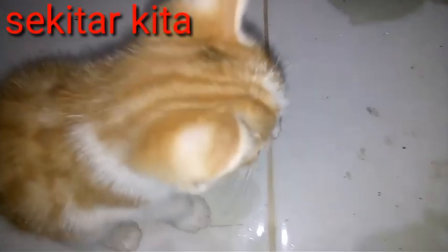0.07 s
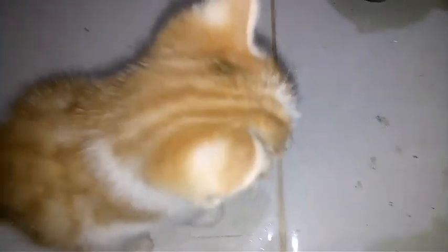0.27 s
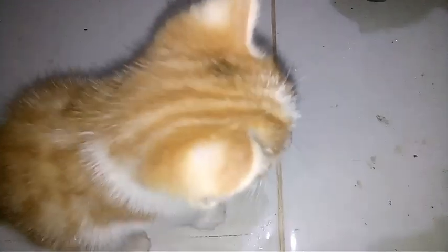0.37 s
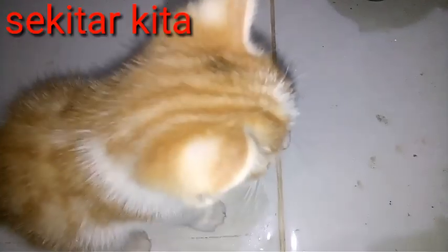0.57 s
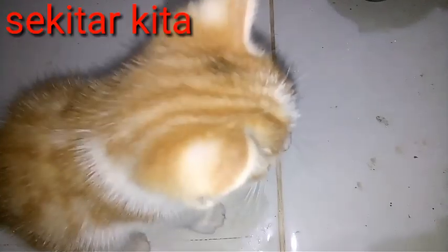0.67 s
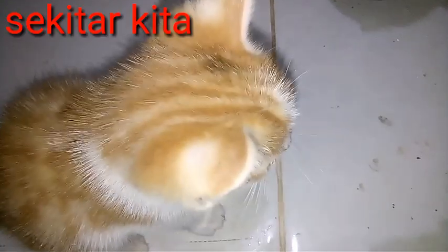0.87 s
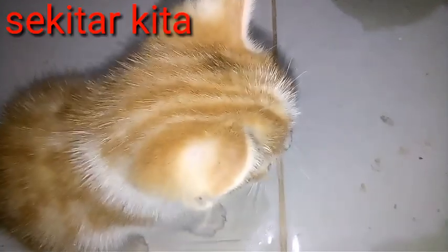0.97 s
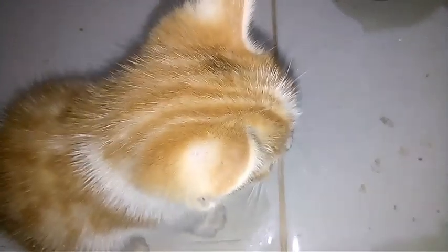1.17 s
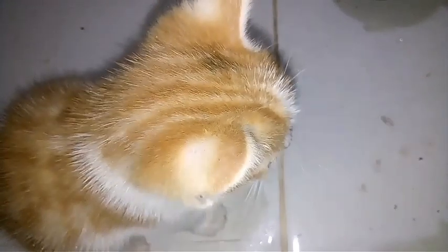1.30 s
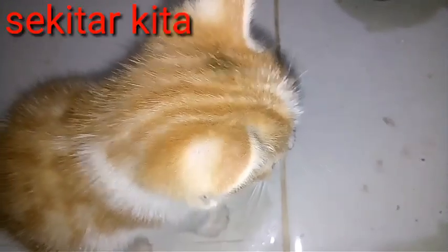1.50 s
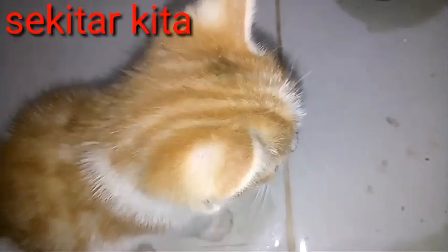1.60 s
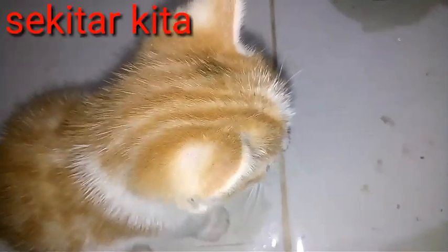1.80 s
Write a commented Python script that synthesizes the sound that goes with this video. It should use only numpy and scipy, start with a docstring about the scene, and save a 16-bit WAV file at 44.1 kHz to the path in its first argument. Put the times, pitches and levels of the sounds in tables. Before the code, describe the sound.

One sharp, dry knock on a hand-held camera thumps the microphone at about 0.2 seconds, far louder than anything else. Tiny casing ticks follow near 0.35 seconds, and the grip rustles slightly around 0.3 and 1.3 seconds. Faint room hiss, low rumble and a thin electrical whine continue throughout, with a distant motor hum from 0.6 seconds. Two brief, far tones barely emerge near 0.5 and 1.75 seconds.

```python
"""A quiet room, heard through a hand-held camera above a crouching cat.
Steady hiss, low rumble and a thin electrical whine lie under a far motor's faint hum.
One sharp knock on the camera's body thumps the microphone, with tiny ticks of the hand on the casing.
The grip rustles slightly twice, and two brief, far tones barely rise out of the hiss."""
import sys
import numpy as np
from scipy import signal
from scipy.fft import rfft, irfft, next_fast_len
from scipy.io import wavfile
from scipy.ndimage import uniform_filter1d, minimum_filter1d, map_coordinates

SR = 44100
rng = np.random.default_rng(int(sys.argv[2]) if len(sys.argv) > 2 else 0)


def persist_wave(psi):
    """Save psi, clipped to +-1, as 16-bit WAV."""
    counts = np.round(np.clip(psi, -1, 1) * 32767).astype(np.int16)
    wavfile.write(sys.argv[1], SR, np.atleast_2d(counts).T)


N = 81585
TIME_S = np.arange(N) / SR


def amp(db):
    """Decibels to gain."""
    return 10 ** (np.asarray(db) / 20)


def unit(x):
    """Scale to rms 1."""
    return x / np.sqrt(np.mean(x ** 2) + 1e-20)


def gain_at(spectrum, hz):
    """Gain of (Hz, dB) points, interpolated in log frequency."""
    points_hz, db = np.transpose(spectrum)
    return amp(np.interp(np.log(hz + 1), np.log(points_hz + 1), db))


def level(points):
    """(s, dB) points to a gain per sample."""
    return amp(np.interp(TIME_S, *np.transpose(points)))


def swell(centre_s, width_s):
    """Gaussian envelope."""
    return np.exp(-.5 * ((TIME_S - centre_s) / width_s) ** 2)


def wobble(rate_hz):
    """Smooth random curve."""
    knots = rng.standard_normal(int(N * rate_hz / SR) + 4)
    return map_coordinates(knots, [TIME_S * rate_hz])


def sine(cycles):
    """Sine of rms 1, random start phase."""
    return np.sqrt(2) * np.sin(2 * np.pi * (cycles + rng.random()))


def filtered(x, response):
    """Zero-phase filter with gain response(hz)."""
    size = next_fast_len(N + SR // 2)
    hz = np.fft.rfftfreq(size, 1 / SR)
    return irfft(rfft(x, size) * response(hz), size)[:N]


def noise(spectrum):
    """Coloured noise of rms 1."""
    return unit(filtered(rng.standard_normal(N), lambda hz: gain_at(spectrum, hz)))


def patchy(x, depth_db):
    """Slow, narrow-band patches of random gain; output rms 1."""
    bins = signal.stft(x, nperseg=1024)[2]
    patches = uniform_filter1d(rng.standard_normal(bins.shape), size=4, axis=0)
    patches = uniform_filter1d(patches, size=12, axis=1)
    bins *= amp(depth_db * unit(patches))
    return unit(signal.istft(bins, nperseg=1024)[1][:N])


def struck(blows, spectrum, size=8192, stop_hz=43, stop_db=23):
    """(s, dB) impulses through a minimum-phase spectrum and the microphone's bass roll-off."""
    cepstrum = irfft(np.log(gain_at(spectrum, np.fft.rfftfreq(size, 1 / SR))))
    cepstrum[1:size // 2] *= 2
    cepstrum[size // 2 + 1:] = 0
    response = irfft(np.exp(rfft(cepstrum)))
    impulses = np.zeros(N)
    for time_s, db in blows:
        impulses[round(time_s * SR)] += amp(db)
    low_cut = signal.cheby2(3, stop_db, stop_hz, "high", fs=SR, output="sos")
    return signal.sosfilt(low_cut, signal.fftconvolve(impulses, response)[:N])


# Rumble spectrum (frequency [Hz], relative density [dB])
RUMBLE_SPECTRUM = [(20, -1), (40, -10), (90, -1), (180, 0.5), (280, 0), (400, -7), (600, -44.5)]
# Rumble envelope before gain (time [s], level [dB])
RUMBLE_ENVELOPE = [(0, -67), (.3, -66), (.6, -70.5), (.76, -66.5), (.92, -70.5), (1.3, -68.5), (1.55, -73),
                   (1.72, -69.5), (1.85, -67)]

def room_rumble(gain_db=3):
    """Low, gently uneven room noise."""
    return amp(gain_db) * level(RUMBLE_ENVELOPE) * patchy(noise(RUMBLE_SPECTRUM), depth_db=3)


# Hiss band spectra (frequency [Hz], relative density [dB])
BROAD_SPECTRUM = [(240, -23), (400, -6), (480, -5.5), (600, 1), (1000, 0), (1340, -5), (1680, -1.5),
                  (2250, -3.5), (2850, -12), (3400, -7.5), (4300, -11.5), (5500, -11.5), (6600, -17.5),
                  (7300, -26.5), (8200, -40.5), (10000, -70)]
MID_SPECTRUM = [(500, -51), (900, -25), (1400, -4), (1680, 1), (2300, -12), (2950, -4.5), (3400, -15.5),
                (4500, -40), (8000, -69)]
SIZZLE_SPECTRUM = [(3000, -65), (4200, -16), (5000, 0), (5500, 4), (5850, -4), (6300, -26), (8000, -64)]
# Hiss band envelopes (time [s], level [dB])
MID_ENVELOPE = [(0, -68.5), (.5, -67), (.85, -68.5), (1.25, -69), (1.55, -73), (1.7, -78), (1.85, -87)]
SIZZLE_ENVELOPE = [(0, -78), (.6, -93), (.8, -73.5), (.95, -84), (1.28, -82), (1.4, -71.5), (1.55, -82),
                   (1.6, -88), (1.67, -71.5), (1.76, -71), (1.85, -82)]

def room_hiss(broad_db=-63.5):
    """Steady broad hiss; a mid band fades and a narrow high sizzle comes and goes."""
    broad = amp(broad_db) * patchy(noise(BROAD_SPECTRUM), depth_db=2.32)
    mid = level(MID_ENVELOPE) * noise(MID_SPECTRUM)
    sizzle = level(SIZZLE_ENVELOPE) * noise(SIZZLE_SPECTRUM)
    return broad + mid + sizzle


def electrical_whine(hz=6449, level_db=-89.5):
    """One thin, steady tone."""
    return amp(level_db) * sine(hz * TIME_S)


# Weak motor partials (cycle multiple, relative level [dB])
WEAK_PARTIALS = [(2, -5.5), (5, -7), (6, -14)]
# Envelopes of the weak partials and the strongest, the drone (time [s], level [dB])
WEAK_ENVELOPE = [(0, -80), (.3, -72), (.45, -68), (.7, -59.5), (1.05, -61.5), (1.4, -60), (1.85, -71)]
DRONE_ENVELOPE = [(0, -75.5), (.48, -72.5), (.6, -58.5), (.76, -57), (.9, -72), (.98, -66), (1.07, -59),
                  (1.5, -59.5), (1.72, -56.5), (1.85, -59)]

def motor_hum(cycle_hz=31.3, drift_hz=.1, waver_db=1.7, drone_multiple=4):
    """A far motor hums on multiples of its slightly unsteady cycle."""
    cycles = np.cumsum(cycle_hz + drift_hz * wobble(4)) / SR
    weak = sum(amp(db + waver_db * wobble(4.3)) * sine(k * cycles) for k, db in WEAK_PARTIALS)
    drone = sine(drone_multiple * cycles)
    return level(WEAK_ENVELOPE) * weak + level(DRONE_ENVELOPE) * drone


# Hand contacts (time [s], level [dB])
CONTACTS = [(.2256, -6.5), (.3538, -18.5), (.3572, -22)]
# Casing response to the hand (frequency [Hz], gain [dB])
CASING_SPECTRUM = [(100, -39), (400, -13), (1000, 3), (2000, -12.5), (3200, -5.5), (4200, -15), (7000, -34),
                   (9000, -62)]

def casing_ticks():
    """Light contacts of the hand tick on the casing."""
    return struck(CONTACTS, CASING_SPECTRUM)


# Camera body response and its steep treble fall (frequency [Hz], gain [dB])
BODY_SPECTRUM = [(60, -4.5), (130, 0.2), (260, -4.5), (410, -9), (465, -6), (560, -7), (980, -5.5),
                 (1120, -8.5), (1330, -6.5), (1550, -12), (1900, -15), (3000, -18.5), (3450, -24),
                 (3750, -36), (4800, -29), (5800, -40)]
BODY_TREBLE = [(7400, -49), (8600, -73), (11000, -69), (15000, -88)]

def body_knock(time_s=.2277, impulse_db=29.5):
    """One hard, dry blow reaches the microphone through the camera's body."""
    return struck([(time_s, impulse_db)], BODY_SPECTRUM + BODY_TREBLE)


# Grip shifts (centre [s], width [s], level [dB])
GRIP_SHIFTS = [(.33, 0.037, -63.5), (1.26, 0.034, -69)]

def grip_rustle():
    """The shifting grip rubs soft swells of noise from the casing."""
    envelope = sum(amp(db) * swell(centre_s, width_s) for centre_s, width_s, db in GRIP_SHIFTS)
    return envelope * noise(CASING_SPECTRUM)


# Far tones (centre [s], width [s], frequency [Hz], level [dB])
FAR_TONES = [(.49, 0.045, 554.4, -68), (1.75, 0.08, 234, -65.5)]

def far_tones():
    """Faint pure tones swell and fade."""
    return sum(amp(db) * swell(centre_s, width_s) * sine(hz * TIME_S)
               for centre_s, width_s, hz, db in FAR_TONES)


def scene():
    """Room and camera handling at one microphone."""
    room = room_rumble() + room_hiss() + electrical_whine() + motor_hum()
    handling = casing_ticks() + body_knock() + grip_rustle()
    return (room + handling + far_tones())[None]


def limiter(x, ceiling=.965, window_s=.001):
    """Fast, smoothed gain reduction holds peaks under the ceiling."""
    size = round(window_s * SR)
    needed_gain = np.minimum(1, ceiling / (np.abs(x) + 1e-9))
    held_gain = minimum_filter1d(needed_gain, 2 * size + 1)
    return x * uniform_filter1d(uniform_filter1d(held_gain, size), size)


def record(dry):
    """The camera adds white self-noise, limits peaks and cuts the top treble."""
    self_noise_db, top_hz = -86, 15500
    limited = limiter(dry[0] + amp(self_noise_db) * rng.standard_normal(N))
    return filtered(limited, lambda hz: hz < top_hz)[None]


dry = scene()
out = record(dry)
persist_wave(out)
```